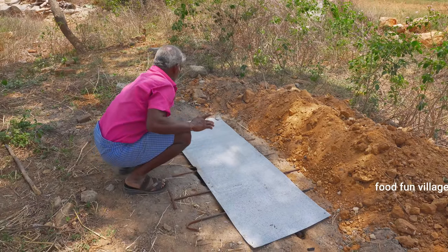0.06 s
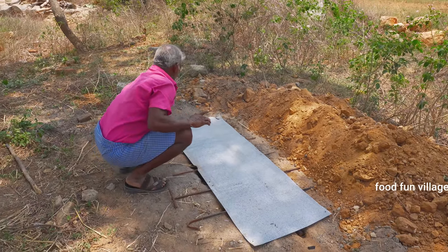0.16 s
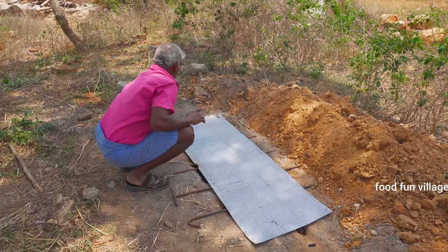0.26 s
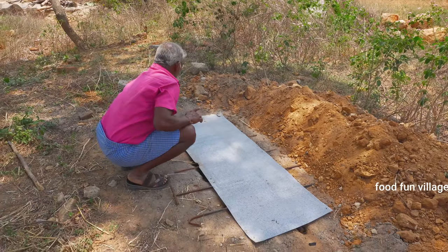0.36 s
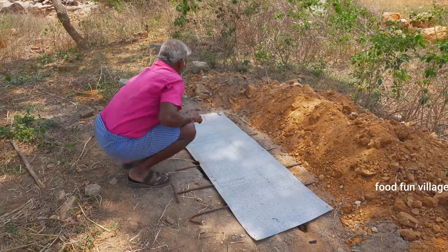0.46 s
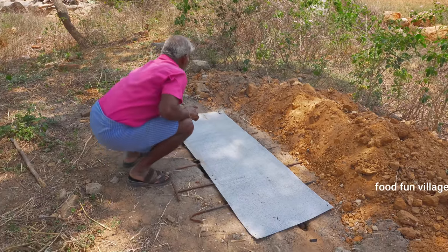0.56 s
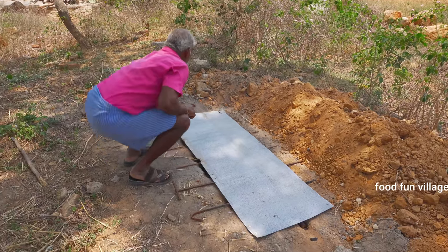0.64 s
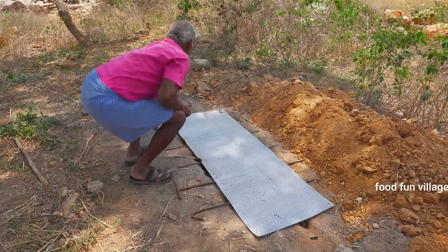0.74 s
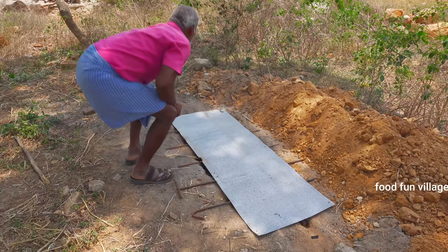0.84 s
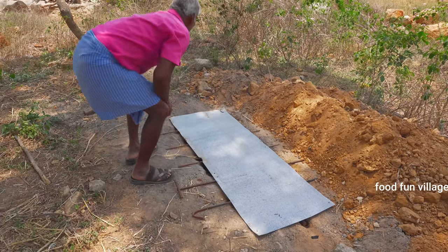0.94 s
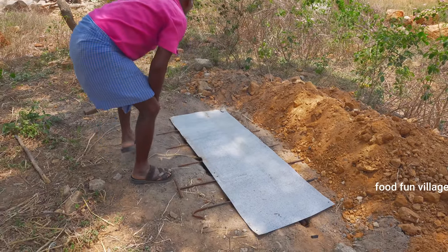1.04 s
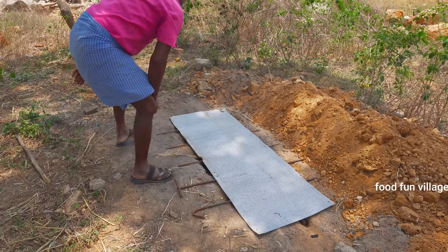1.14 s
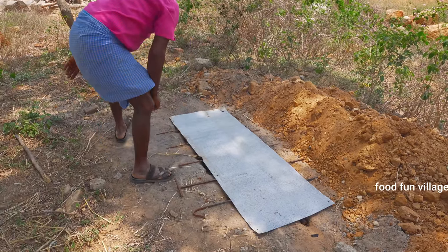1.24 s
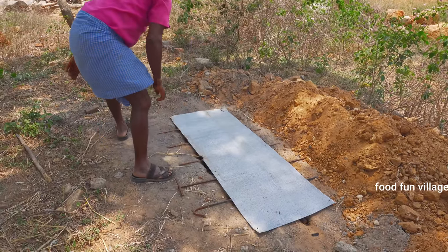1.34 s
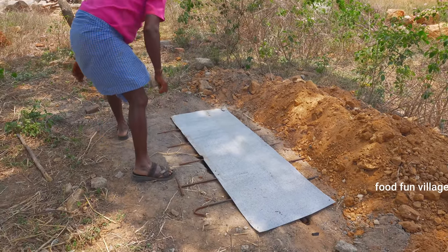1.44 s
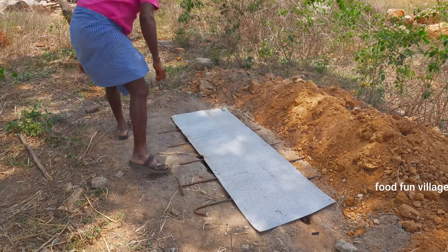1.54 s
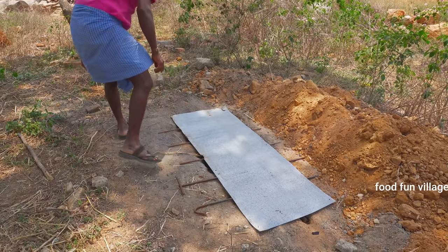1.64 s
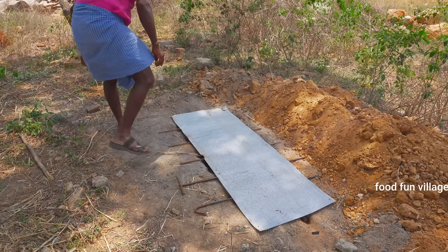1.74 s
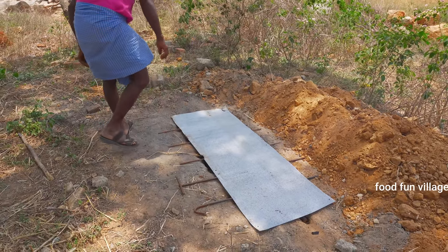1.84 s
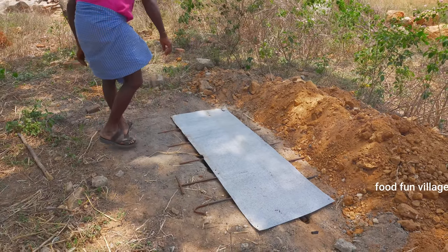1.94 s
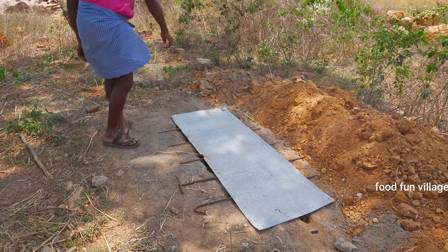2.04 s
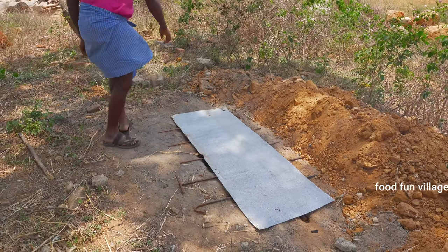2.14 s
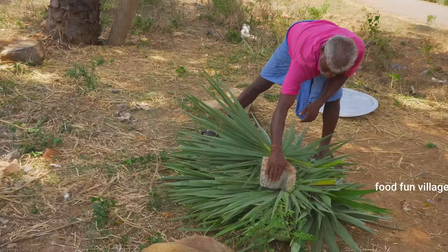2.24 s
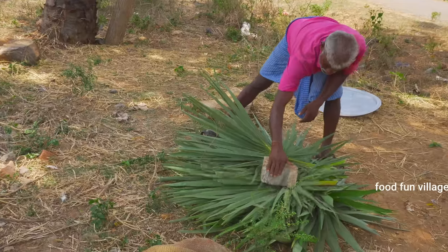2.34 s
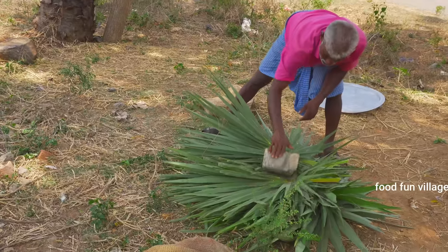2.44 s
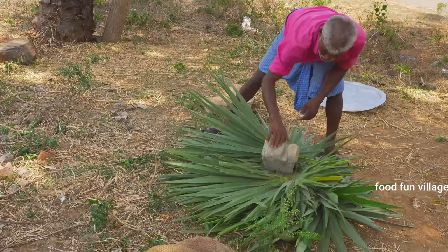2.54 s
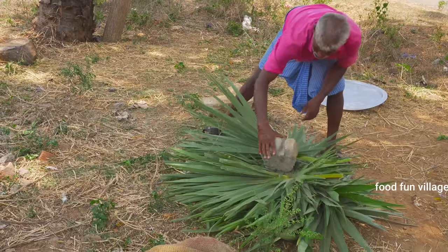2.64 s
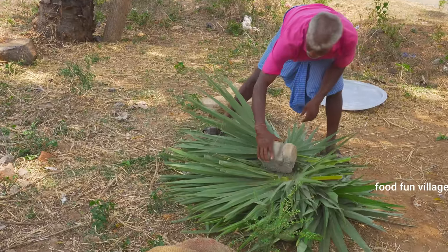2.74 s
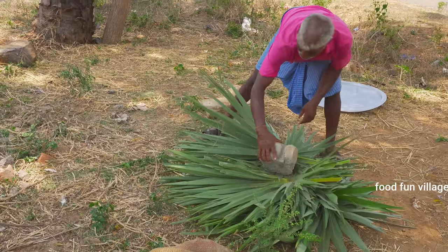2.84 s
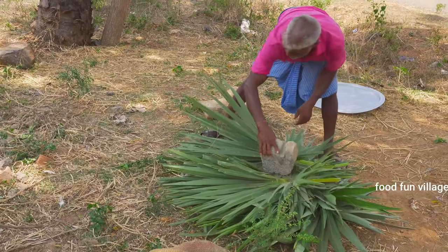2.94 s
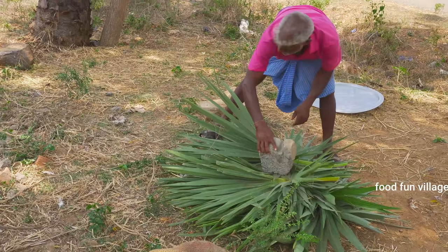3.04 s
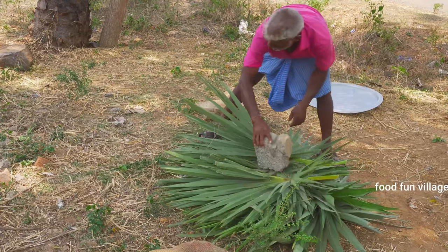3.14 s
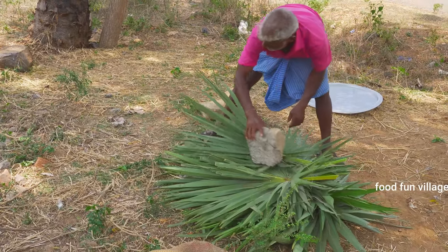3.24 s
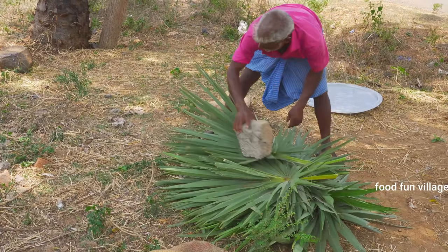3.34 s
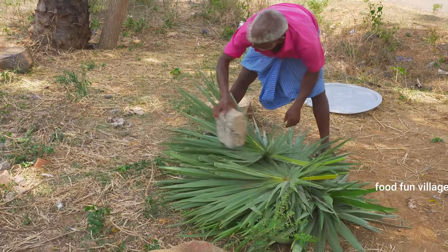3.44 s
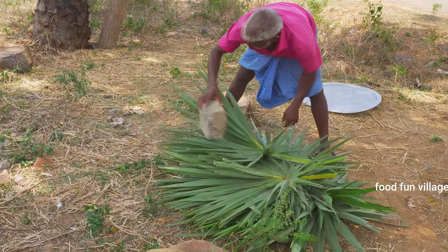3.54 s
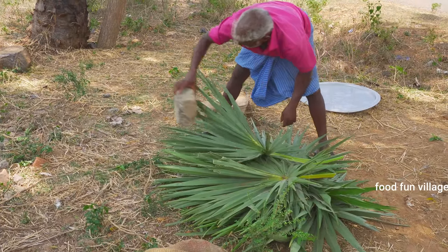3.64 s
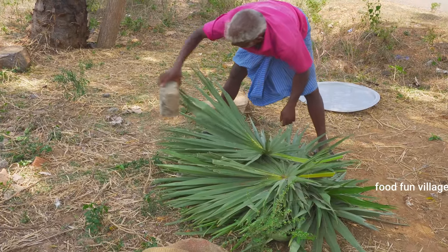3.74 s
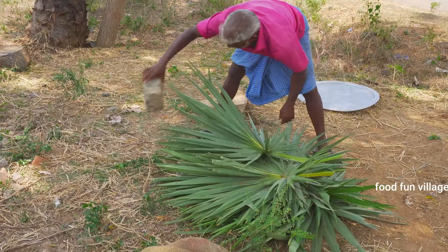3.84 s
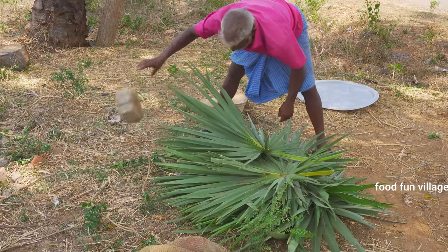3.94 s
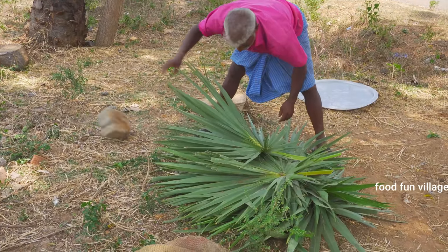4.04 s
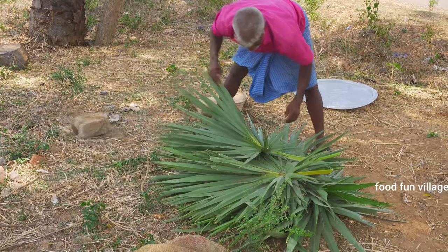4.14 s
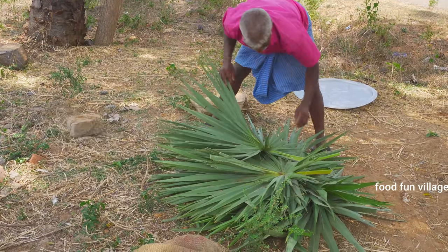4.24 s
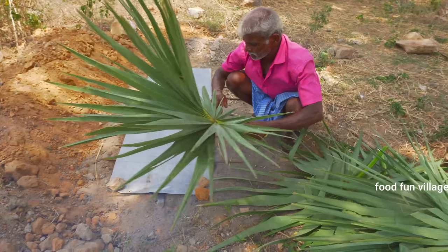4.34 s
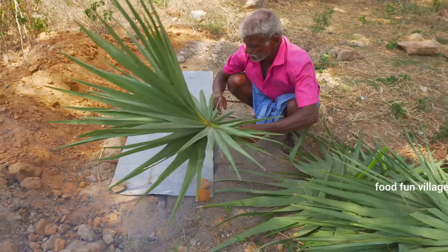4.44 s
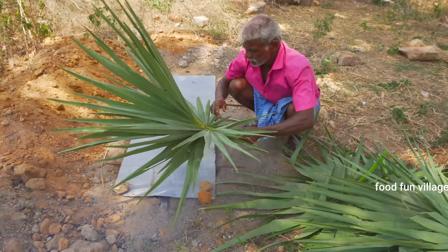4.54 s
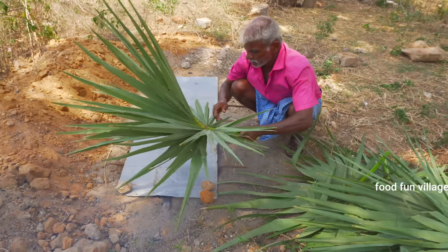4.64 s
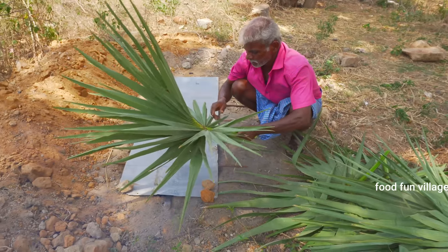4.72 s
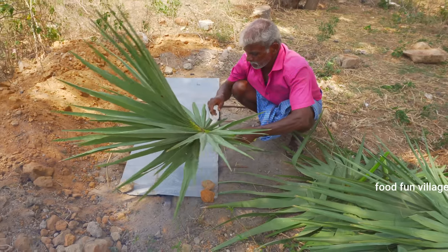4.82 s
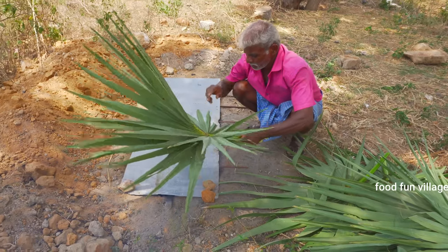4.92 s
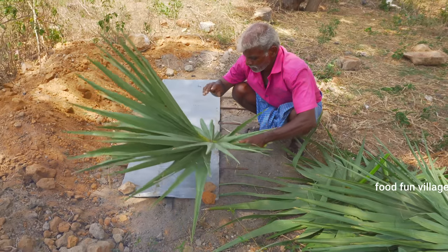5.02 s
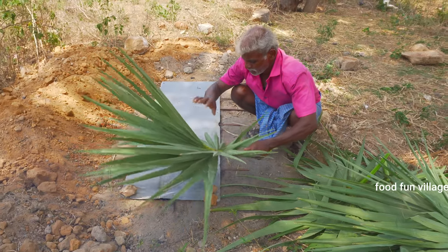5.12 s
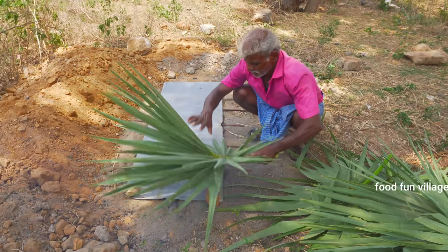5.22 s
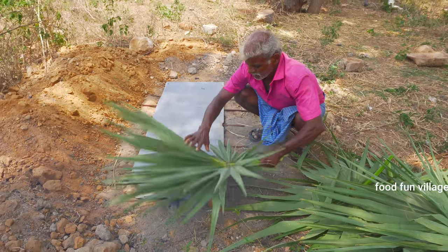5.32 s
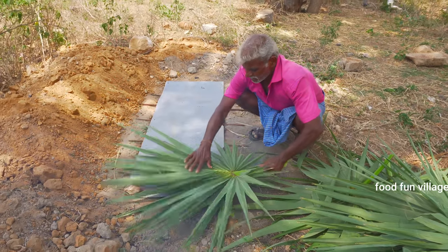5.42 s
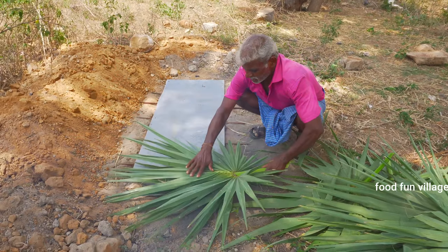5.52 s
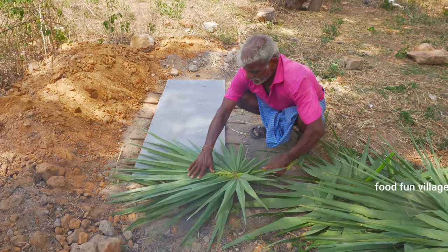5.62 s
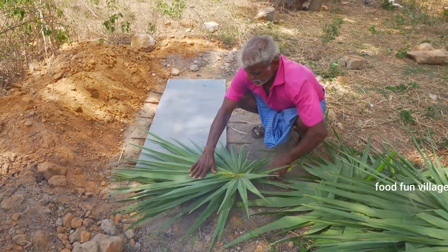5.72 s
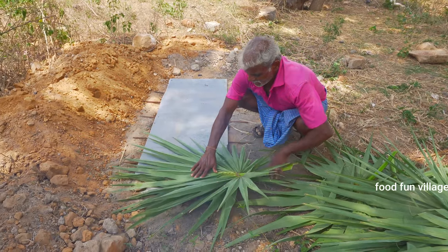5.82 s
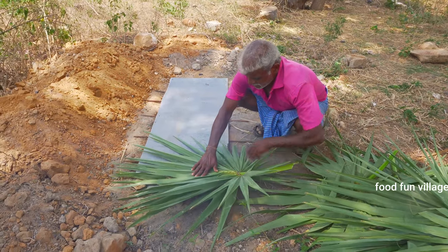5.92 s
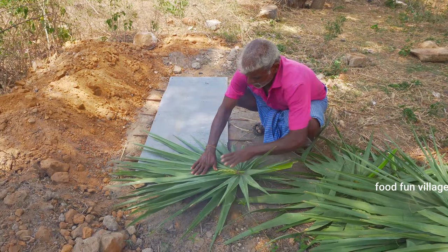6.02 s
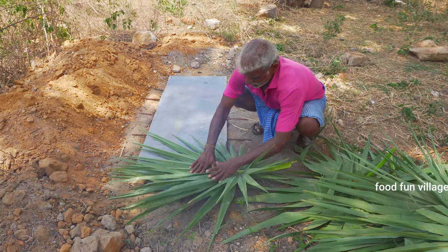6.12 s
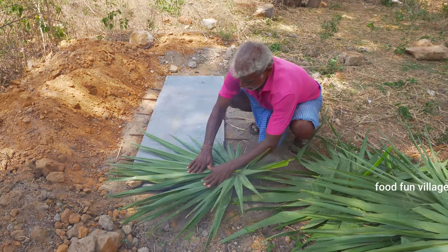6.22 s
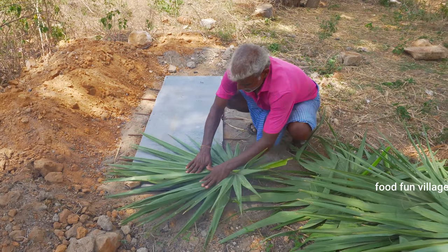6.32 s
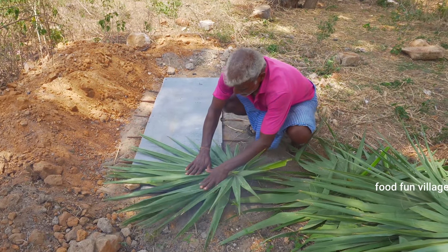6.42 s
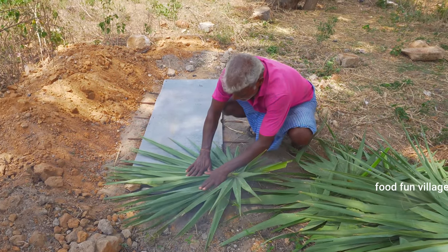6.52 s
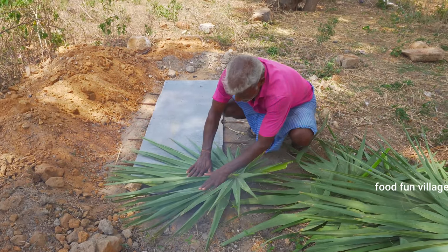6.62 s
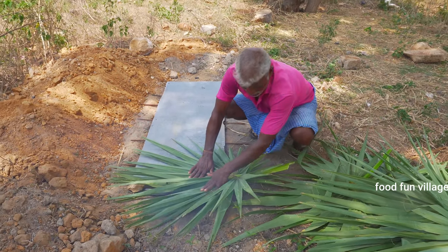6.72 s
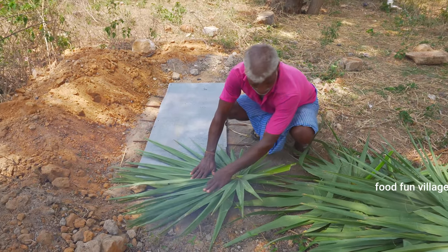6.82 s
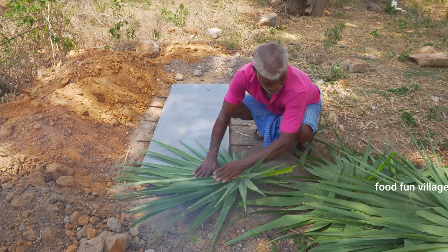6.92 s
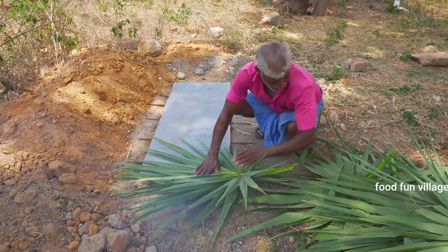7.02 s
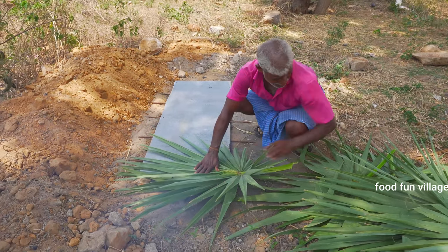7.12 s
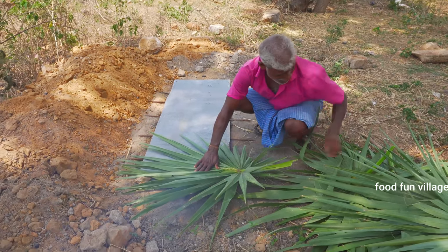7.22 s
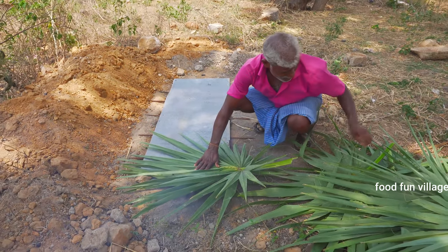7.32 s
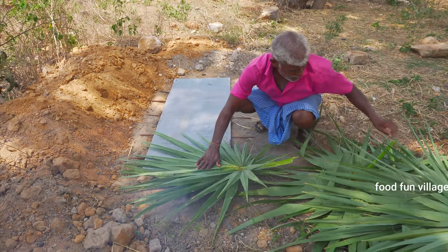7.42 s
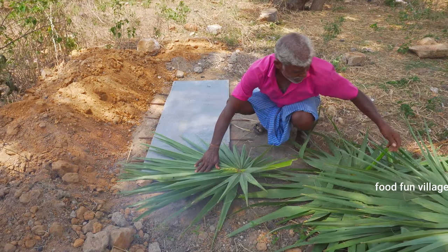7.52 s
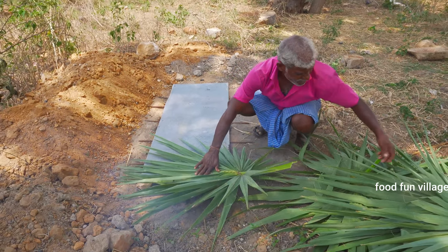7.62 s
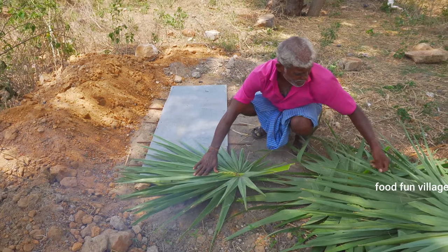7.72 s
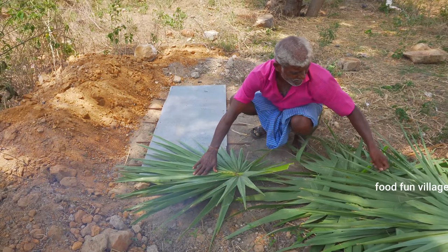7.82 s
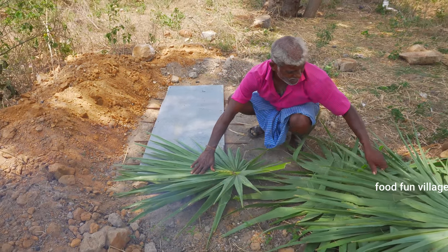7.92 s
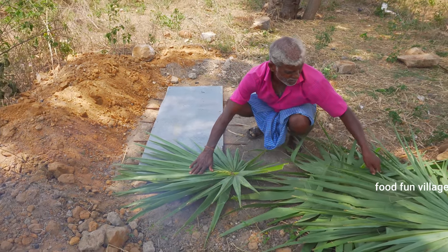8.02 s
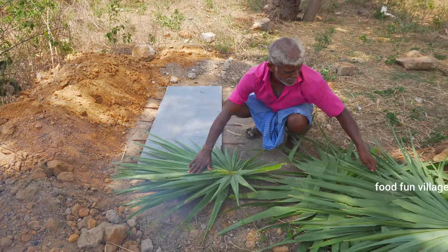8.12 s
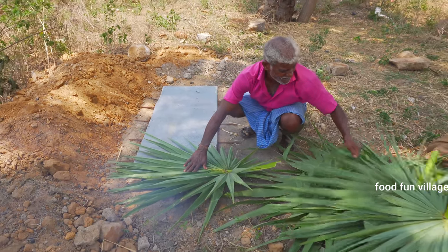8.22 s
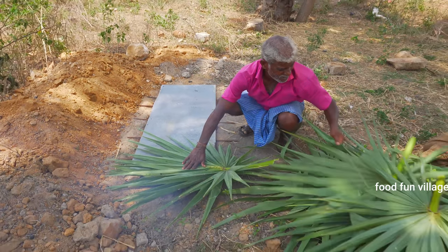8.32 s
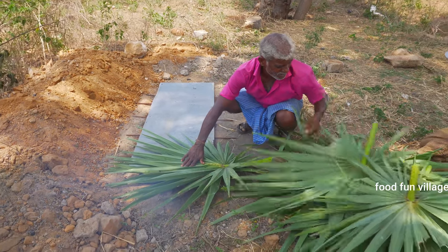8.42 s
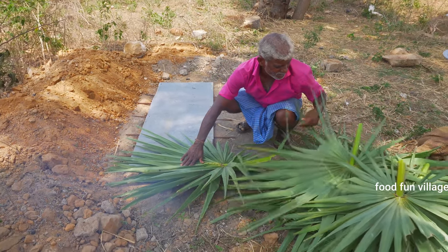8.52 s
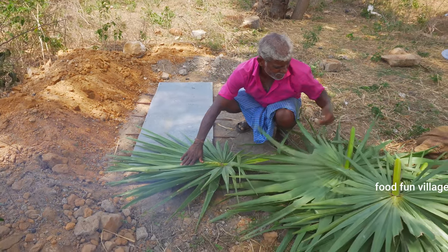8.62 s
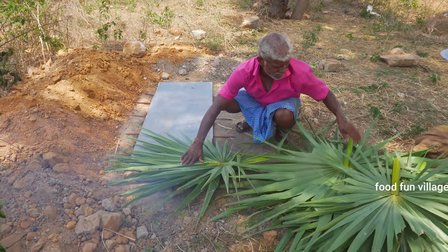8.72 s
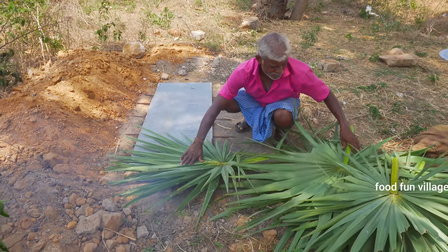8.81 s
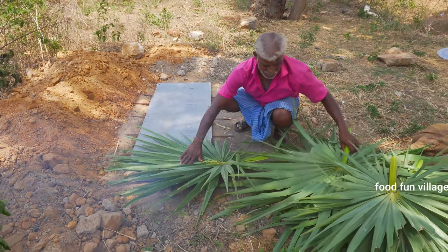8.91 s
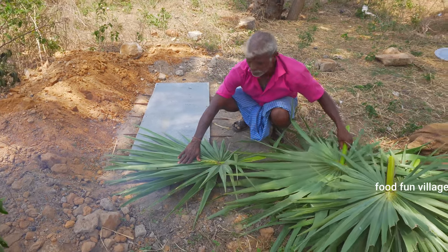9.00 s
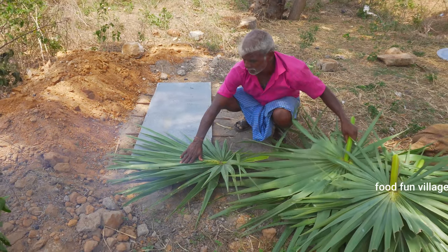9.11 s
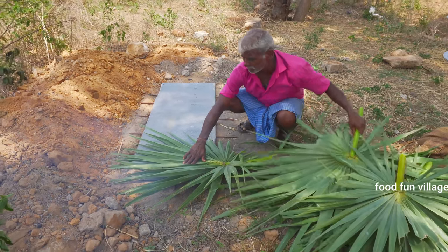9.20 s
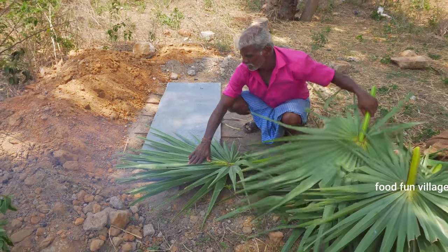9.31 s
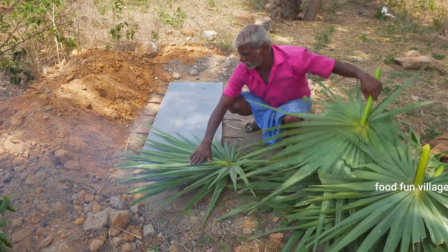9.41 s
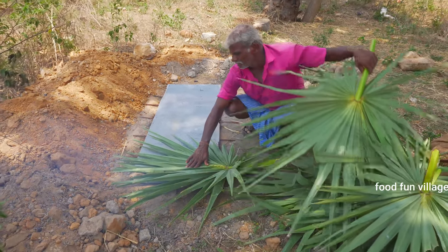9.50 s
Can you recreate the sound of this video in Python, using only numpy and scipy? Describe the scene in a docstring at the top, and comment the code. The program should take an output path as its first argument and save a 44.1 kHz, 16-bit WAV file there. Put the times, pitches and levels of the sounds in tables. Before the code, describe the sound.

A thin metal sheet rings at the very start and is stilled within a second. Twigs and joints click, with soft footfalls near 0.9 and 2.1 seconds and a few faint, distant chirps. From about 2.3 to 4 seconds a stone scrapes off a pile of stiff palm fronds, slightly to the right, the leaf ribs cracking under it. It lands on soil with a dull thud at 4.1 seconds. From there until 8 seconds fronds rustle, crunch and snap close by as they are turned and pressed onto the sheet, with a firm knock at about 5.6. A small bird whistles quick rising notes between 4.5 and 6.1 seconds. From 8.2 seconds fronds slide from the pile with a swish and a knock at 8.7, and a second pull swells at about 9.5. Faint wind in far leaves hisses throughout this open outdoor place.

```python
"""Stiff palm fronds rustle and crack by an outdoor cooking pit, their leaves catching and slipping.
A thin metal sheet rings out first and is stilled; joints and twigs click. A stone is dragged off the
pile and thrown on the soil with a dull thud, then fronds are pressed on the sheet and pulled from the
pile with a swish. A small bird whistles rising notes, others chirp far off, and distant leaves hiss."""
import sys
import numpy as np
from scipy import signal
from scipy.fft import rfft, irfft, next_fast_len
from scipy.io import wavfile
from scipy.ndimage import uniform_filter1d, map_coordinates

SR = 44100
rng = np.random.default_rng(int(sys.argv[2]) if len(sys.argv) > 2 else 0)


def transcribe(u):
    """Save the signal u as a 16-bit wav file named by the first command-line argument.

    u: samples, shape (n,) or (channels, n), limited to [-1, 1]; the rate is SR.
    q: integer samples, one column per channel.
    """
    v = np.clip(np.atleast_2d(u).T, -1, 1)
    q = np.round(v * 32767).astype(np.int16)
    wavfile.write(sys.argv[1], SR, q)


N = 421596

# The sheet's clear modes. Each row: pitch in Hz, relative level in dB, time to fall 60 dB in seconds.
SHEET_MODES = [(245, -4.5, 0.98), (716, -8, 0.86), (1145, 1, 0.33), (1540, -13, 0.44), (1860, -8, 0.61),
               (2100, -11, 0.61)]
# Its wash of dense modes. Each row: frequency in Hz, relative level in dB.
WASH_TONE = [(24, -67), (55, -42), (146, -7.5), (245, -0.5), (422, 0), (1140, 6.5), (1880, 6.5),
             (9000, -24.5), (19800, -120)]
# The tail of that wash. Each row: frequency in Hz, time to fall 60 dB in seconds.
WASH_T60 = [(100, 8), (250, 1.4), (700, 0.93), (2000, 0.47), (6000, 0.56)]
# Colour of the far leaves. Each row: frequency in Hz, relative level in dB.
BREEZE_TONE = [(25, -22.5), (94, -16), (141, -16), (235, -4.5), (352, -1), (414, 0), (486, 4), (5090, -1),
               (11100, -9.5), (15800, -17.5)]
# Their fader. Each row: time in seconds, level in dB.
BREEZE_LEVEL = [(0, -51.5), (2.2, -52), (2.3, -47.5), (4.4, -50.5), (9.56, -51)]
# Stereo width of breeze and of single sources. Each row: frequency in Hz, left-right likeness (1: mono).
BREEZE_LIKENESS = [(60, 0.99), (380, 0.09), (2380, 0.15), (15000, 0.41)]
SOURCE_LIKENESS = [(60, 0.91), (240, 1), (950, 0.98), (2200, 0.97), (3770, 0.65), (15000, 0.57)]
# Distant birds. Each row: start in seconds, length in seconds, pitch in Hz, level in dB.
FAR_CHIRPS = [(0.306, 0.098, 3220, -56), (1.155, .09, 3150, -60), (2.292, 0.075, 4280, -46)]
# Leaves, twigs and joints. Each row: start in seconds, level in dB, centre in Hz, relative knock in dB.
SNAPS = [(0.446, -20.5, 3120, -9), (0.695, -11, 3280, -3), (0.9323, -25, 5330, -15),
         (1.048, -17.5, 3640, -5.5), (1.1288, -22, 4600, -33), (1.306, -33, 1780, 0.5),
         (1.416, -32, 1510, 5), (1.5615, -22, 5550, -31), (2.1252, -25, 2310, -13),
         (2.173, -9, 5700, -16.5), (4.142, -12, 1600, 6), (4.2347, -11.5, 4300, -8.5),
         (4.314, -13.5, 10800, -31), (4.3397, -17, 4770, -27), (4.357, -16, 4470, -10),
         (4.365, -13, 4400, -24), (4.376, -16.5, 4060, -22), (4.68, -26.5, 1700, -10),
         (5.012, -15, 7450, -55), (5.243, -31, 4000, -9), (5.4984, -5, 2200, -16), (5.6205, -13, 4940, 0),
         (5.655, -12, 2410, 8), (5.7437, -13, 1820, -32), (5.8354, -16, 2100, -15), (5.955, -20.5, 1570, 0),
         (6.11, -18, 2170, -5), (6.144, -19, 5060, 0), (6.151, -17, 6160, -7), (6.197, -16, 4500, -20),
         (6.2098, -10.5, 4000, -8), (6.238, -17, 6000, -20), (6.31, -16, 2500, -17),
         (6.391, -22.5, 1950, 1), (6.4744, -11.5, 5460, -7), (6.52, -18, 5500, -25),
         (6.553, -14, 3870, -1.5), (6.575, -15, 6460, -8), (6.582, -3.5, 3900, -43), (6.611, -7, 4760, -37),
         (6.727, -14.5, 2160, -23), (6.7757, -17, 4100, -33), (6.8686, -18.5, 5900, -4.5),
         (6.972, -25.5, 1880, 8.5), (6.987, -10.5, 4270, -19), (7.3474, -22.5, 2180, -10),
         (7.619, -18.5, 4640, -14), (7.796, -19.5, 2760, -9), (8.773, -14.5, 4400, -27),
         (8.8424, -15.5, 8000, -12), (9.017, -18, 4740, -8), (9.0359, -15, 3040, -7),
         (9.092, -15.5, 3030, -23)]
# Where the hands work. Each row: time in seconds, left over right in dB.
HAND_PAN = [(.4, 3), (2.1, 7), (2.5, -3.5), (3.9, 0), (4.14, 6), (4.4, -0.5), (6.6, 3), (7.8, -2.5),
            (8.3, -9.5), (8.9, -3.5), (9.45, -8)]
# Heel, stone and palm landing. Each row: start in seconds, level in dB, base pitch in Hz,
# base decay time in seconds.
THUDS = [(0.874, -31, 455, 0.056), (2.108, -33.5, 508, 0.024), (4.145, -26, 247, 0.084),
         (4.235, -33, 283, 0.13), (5.558, -8.5, 750, 0.048), (6.645, -32.5, 242, 0.14),
         (7.645, -24.5, 396, 0.23), (8.701, -10, 810, 0.027), (8.717, -22, 926, 0.031)]
# Long gestures: the stone shifts, rests and drags off with a catch; two fronds are pulled, with fumbling
# between. Each row: time in seconds, level in dB, relative body (under 1.5 kHz) in dB.
STONE_DRAG = [(2.26, -71.5, 10.5), (2.42, -34.5, -6), (2.547, -37, 0.5), (2.618, -27, -3.5),
              (2.777, -39.5, -7), (2.93, -55, 4.5), (3.072, -38, -9), (3.16, -42, -4), (3.402, -27, -2),
              (3.507, -29, -1.5), (3.555, -45.5, 6.5), (3.58, -26.5, -2.5), (3.908, -33, -6.5),
              (4.0, -59.5, 11.5), (4.1, -67, 5.5)]
FROND_PULLS = [(8.16, -54, -11), (8.23, -50.5, 1), (8.25, -34.5, -3), (8.372, -22.5, -7),
               (8.565, -23.5, -9), (8.61, -30, -2), (8.72, -30.5, -3), (8.805, -48.5, 0.5), (8.9, -46, 1),
               (8.94, -31.5, -9.5), (8.98, -44.5, -1.5), (9.16, -41.5, -7), (9.338, -32, -5.5),
               (9.346, -26, -4), (9.56, -21.5, -11.5)]
# The loudest leaf ribs slipping under the stone. Each row: start in seconds, level in dB.
RIB_SLIPS = [(2.4124, -16.5), (2.4967, -13), (2.5194, -18), (2.5605, -10.5), (2.570, -7.5), (2.6, -5.5),
             (2.613, -7.5), (2.6254, -12), (2.645, -8), (2.6515, -11), (2.6596, -7), (2.675, -20),
             (2.6954, -14), (2.7074, -9), (2.7218, -6.5), (2.7505, -10), (2.7654, -13), (2.7705, -16),
             (2.7881, -15.5), (2.85, -24.5), (2.8694, -26), (2.9439, -25.5), (2.9767, -22.5), (3.055, -11),
             (3.0744, -15), (3.1682, -19.5), (3.1906, -16), (3.2265, -13.5), (3.275, -11), (3.3358, -14),
             (3.461, -14), (3.5715, -11.5)]
# Short gestures in the leaves. Each row: crest, rise and fall in seconds, level in dB,
# relative body (under 1.5 kHz) in dB, relative top (over 7.5 kHz) in dB.
LAYING_MOVES = [(4.16, 0.025, 0.24, -51, 13, -5), (4.245, 0.086, 0.095, -42, -4, 9),
                (4.32, 0.3, 0.023, -45, -6, 6.5), (4.7, 0.45, 1, -48.5, -12.5, -9),
                (5.028, 0.15, 0.16, -40.5, -22, 4.5), (5.25, .02, 0.1, -52.5, -17, 11),
                (5.31, 0.031, 0.25, -40.5, -0.5, -11), (5.441, 0.13, 0.37, -28.5, -2, -4.5),
                (5.54, 0.25, 0.1, -31.5, 2, -11), (5.681, 0.4, 0.19, -30, 1, -9.5),
                (5.963, 0.33, 0.063, -38, -1.5, -15), (6.229, 0.13, 0.26, -35, 1, -14),
                (6.309, 0.19, 0.065, -32.5, -14, -13), (6.49, 0.29, 0.23, -43, -14, -8.5),
                (6.64, 0.17, 0.31, -37, -3.5, -9.5), (7.001, 0.14, 0.15, -37.5, -8, -10.5),
                (7.39, 0.18, 0.098, -41.5, -4.5, -5), (7.66, 0.27, 0.1, -42, -2.5, -1),
                (7.83, 0.18, 0.14, -44, 0.5, 1), (8.13, 0.15, 0.083, -49.5, -4.5, 1.5)]
# Colour of each rustle. Each row: frequency in Hz, relative level in dB.
STONE_TONE = [(24, -70), (40, -43), (175, -29), (289, -15.5), (380, -17.5), (611, -5), (846, -8),
              (1620, 0.5), (2360, 3), (3500, 0), (4400, 3.5), (5810, 4), (8600, -0.5), (9600, 2.5),
              (12000, 0), (15800, 0)]
LAYING_TONE = [(24, -62), (40, -29), (179, -24.5), (261, -9), (330, -12), (553, -10), (805, -1.5),
               (1360, -5), (2450, -3), (2800, -8.5), (3200, -7.5), (4500, -4.5), (7500, -9), (11000, -13.5),
               (15800, -16.5)]
PULLING_TONE = [(24, -70), (40, -46), (166, -28), (311, -13), (380, -15), (539, -6.5), (1110, -5),
                (1360, -9), (2190, -4), (2610, -4), (3700, -6), (4640, -10), (6580, -11), (12600, -17),
                (15800, -22)]
# Stereo tilt of each rustle. Each row: frequency in Hz, relative left over right in dB.
STONE_TILT = [(60, -8), (380, -8.5), (2380, -9.5), (15000, -2)]
LAYING_TILT = [(60, 0.33), (380, 2.1), (2380, 0.76), (15000, 8.1)]
PULLING_TILT = [(60, -7), (380, -6.5), (2380, -6.5), (15000, 4.5)]
# Stereo phase of each rustle. Each row: frequency in Hz, lead of the left side in radians.
STONE_LEAD = [(0, 0)]
LAYING_LEAD = [(0, -2), (3620, 0.53), (4570, 0.4), (9220, 8), (16300, 4)]
PULLING_LEAD = [(0, -2), (2070, 0.5), (3190, -5.5), (4910, -6.5), (16300, -4.5)]
# The small bird's song. Each row: start and length in seconds, opening and turning pitch in Hz,
# curve of the glide as an exponent, level in dB.
BIRD_NOTES = [(4.542, 0.1, 5200, 6540, 1.7, -52), (4.712, 0.087, 4800, 6530, 1.9, -41.5),
              (4.857, 0.08, 4700, 6530, 1.3, -42), (4.997, 0.082, 4700, 6620, 1.2, -40.5),
              (5.136, 0.083, 4700, 6530, 1.3, -38.5), (5.277, 0.088, 4650, 6680, 1.22, -36),
              (5.782, .05, 3700, 7230, 0.88, -42), (5.921, 0.073, 3450, 6900, 1.9, -40),
              (6.036, 0.051, 5530, 3270, 1.1, -46), (6.093, 0.046, 3300, 6750, 1.2, -42)]
# The swish of the first pulled frond. Each row: centre in Hz, width in octaves, level in dB.
SWISH_BANDS = [(2120, 0.14, -30), (3440, 0.24, -23.5)]


def amp(db):
    """Decibels to gain."""
    return 10 ** (np.asarray(db) / 20)


def unit(x):
    """x at rms 1."""
    return x / np.sqrt(np.mean(x ** 2) + 1e-20)


def along(points, hz):
    """Read a curve of (Hz, value) points on a log-frequency axis."""
    f, v = np.transpose(points)
    return np.interp(np.log(hz + 1), np.log(f + 1), v)


def filtered(x, response):
    """EQ x with a gain given as a function of frequency."""
    m = next_fast_len(x.shape[-1] + 4096)
    return irfft(rfft(x, m) * response(np.fft.rfftfreq(m, 1 / SR)), m)[..., :x.shape[-1]]


def bell(hz, centre_hz, octaves):
    """A bell curve on the log-frequency axis."""
    return np.exp(-.5 * (np.log2((hz + 1) / centre_hz) / octaves) ** 2)


def stereo_noise(size, likeness):
    """White noise whose stereo width follows frequency."""
    def mid_side(hz):
        angle = np.arccos(np.clip(along(likeness, hz), -1, 1)) / 2
        return np.array([np.cos(angle), np.sin(angle)])
    mid, side = filtered(rng.standard_normal((2, size)), mid_side)
    return np.array([mid + side, mid - side])


def pan(db):
    """Left and right gains for a level difference."""
    return amp(np.array([db / 2, -db / 2]))


def hand_pan_db(t):
    """Where the hands sit in the stereo image at times t."""
    return np.interp(t, *np.transpose(HAND_PAN))


def crackle(size, rate, spread_db, life_s):
    """Power envelope of mean 1: random leaf contacts, few strong and many weak, sharp on, dying fast."""
    strengths = amp(spread_db * np.clip(rng.standard_normal(size), -3, 2.2))
    kicks = (rng.random(size) < rate / SR) * strengths ** 2 / rate
    softened = uniform_filter1d(kicks, size=24)
    power = np.abs(signal.lfilter([1], [1, -np.exp(-1 / (life_s * SR))], softened))
    return power / (power.mean() + 1e-20)


def metal_sheet(stop_s=0.63):
    """The dropped sheet rings, a few clear modes in a wash of many, until a hand or foot stills it."""
    t = np.arange(SR) / SR
    hz, frame_s, spectrum = signal.stft(stereo_noise(SR, [(200, 0.97), (4000, 0.88)]), SR, nperseg=512)
    spectrum *= amp(along(WASH_TONE, hz)[:, None] - 60 * frame_s / along(WASH_T60, hz)[:, None])
    wash = signal.istft(spectrum, SR, nperseg=512)[1][:, :SR]
    ring = sum(amp(db - 60 * t / t60) * np.sin(2 * np.pi * (f * t + rng.random()))
               for f, db, t60 in SHEET_MODES)
    out = amp(-29.5) * wash / np.std(wash[:, :SR // 10]) + amp(-31.5) * ring
    damping = amp(-60 * np.clip(t - stop_s, 0, 1) / 0.43)
    return np.pad(out * damping, ((0, 0), (0, N - SR)))


def breeze():
    """Far leaves in light wind: a faintly grainy bed of hiss."""
    grain = np.sqrt(0.75 + 0.24 * crackle(N, rate=34, spread_db=-1.5, life_s=0.0036))
    hiss = unit(filtered(stereo_noise(N, BREEZE_LIKENESS) * grain, lambda f: amp(along(BREEZE_TONE, f))))
    return amp(np.interp(np.arange(N) / SR, *np.transpose(BREEZE_LEVEL))) * hiss


def far_birds():
    """Distant chirps, smeared by the trees into narrow puffs of noise."""
    out = np.zeros((2, N))
    for start, length, hz, db in FAR_CHIRPS:
        u = np.arange(round(length * SR)) / (length * SR)
        puff = unit(filtered(stereo_noise(len(u), SOURCE_LIKENESS), lambda f: bell(f, hz, 0.047)))
        out[:, round(start * SR):][:, :len(u)] += amp(db - 6.6 * u) * np.sin(np.pi * u) ** 0.35 * puff
    return out


def snaps():
    """A leaf, twig or joint gives way: a bright spike with a brief rattle, over a lower knock."""
    out, t, preroll = np.zeros((2, N + SR)), np.arange(SR // 20) / SR, SR // 100
    rattle, spike = amp(-60 * t / 0.026), 2.2 * amp(-60 * t / 0.0073)
    envelope = (rattle + spike) * (1 - np.exp(-t / 0.00047))
    for start, db, hz, knock_db in SNAPS:
        burst = np.pad(stereo_noise(len(t), SOURCE_LIKENESS) * envelope, ((0, 0), (preroll, 0)))
        bright = filtered(burst, lambda f: bell(f, hz, 0.28) + 0.5 * bell(f, 1.135 * hz, 1.0))
        knock = filtered(burst, lambda f: 600j * f / (900 ** 2 - f ** 2 + 600j * f) * f / (f + 400))
        snap = bright / np.abs(bright).max() * pan(hand_pan_db(start))[:, None]
        snap += amp(knock_db) * knock / np.abs(knock).max()
        out[:, round(start * SR) - preroll:][:, :snap.shape[1]] += amp(db - 3.5) * snap
    return out[:, :N]


def thuds():
    """Dull blows on soil or sheet: a few damped low swings and a short puff of grit."""
    out, t = np.zeros(N + SR), np.arange(SR // 5) / SR
    attack = 1 - np.exp(-t / 0.00054)
    for start, db, hz, decay in THUDS:
        swing = sum(amp(-60 * t * k / decay) * np.sin(2 * np.pi * hz * k * t) for k in (.85, 1.5, 2.6))
        grit = unit(filtered(rng.standard_normal(len(t)), lambda f: bell(f, 0.95 * hz, 1.0)))
        puff = grit * amp(-75 * t / decay)
        out[round(start * SR):][:len(t)] += amp(db) * (0.24 * swing + 0.54 * puff) * attack
    return filtered(out[:N], lambda hz: hz ** 2 / (hz ** 2 + 90 ** 2))  # small blows carry little bass


def leaf_ring(x, depth_db):
    """Each leaf rings briefly at its own pitches: random patches of gain in time and frequency."""
    spectrum = signal.stft(x, nperseg=512)[2]
    patches = uniform_filter1d(rng.standard_normal(spectrum.shape[1:]), size=3, axis=0)
    patches = uniform_filter1d(patches, size=7, axis=1)
    return signal.istft(spectrum * amp(depth_db * unit(patches)), nperseg=512)[1][:, :x.shape[1]]


def rib_cracks(t, noise, slips, swell_s=0.0013):
    """A slipping rib cracks: a quick burst that rings low and high, scooped between."""
    power = np.zeros(len(t))
    for start, db in slips:
        u = np.clip(t - start, 0, 1) / swell_s
        power += (amp(db - 10) * u * np.exp(1 - u)) ** 2  # trimmed: noise peaks well over its rms
    return filtered(noise * np.sqrt(power), lambda f: (1 - 0.52 * bell(f, 3570, 0.25)) * f / (f + 700))


def late_copy(hz, notch_hz):
    """A faint, late copy of the sound cuts shallow notches at odd multiples of notch_hz."""
    return 1 + 0.12 * np.exp(-1j * np.pi * hz / notch_hz)


def lowpass(hz, corner_hz):
    """Gain of an 18 dB per octave roll-off."""
    return 1 / np.sqrt(1 + (hz / (corner_hz + 1)) ** 6)


def rustle(gesture, tone, tilt, lead, rate, spread_db, life_s, smooth, notch_hz, slips=()):
    """Sliding leaves: a smooth hiss broken up by contacts, some full-range, some in one band only."""
    t, level_db, body_db, top_db = gesture
    start, size, hand_db = round(t[0] * SR), len(t), hand_pan_db(t)
    rate = rate * amp(0.46 * (level_db - level_db.max()))  # faster motion, more contacts a second
    shared = crackle(size, rate, spread_db, life_s)
    noise = leaf_ring(stereo_noise(size, SOURCE_LIKENESS), depth_db=2.5)
    cracks = rib_cracks(t, noise[:, ::-1], slips)
    out, bands, rms = np.zeros((2, N)), [], []
    for lo_hz, hi_hz, trim_db, pan_db in [(0, 1500, body_db, np.zeros(size)), (1500, 3000, 0, hand_db),
                                          (3000, 7500, 0, hand_db), (7500, SR, top_db, hand_db)]:
        def colour(hz):
            band = lowpass(hz, hi_hz) * np.sqrt(1 - lowpass(hz, lo_hz) ** 2)
            balance = pan(along(tilt, hz) - along(tilt, 2740))  # the tilt pivots at 2740 Hz
            phase = np.exp(.5j * along(lead, hz) * [[1], [-1]])
            return late_copy(hz, notch_hz) * amp(along(tone, hz)) * band * balance * phase
        own = crackle(size, rate * 0.42, spread_db, life_s)
        power = amp(2 * level_db) * (smooth + (1 - smooth) * (shared + own) / 2)
        friction = noise * np.sqrt(power) + cracks
        bands.append(filtered(friction * amp(trim_db) * pan(pan_db), colour))
        rms.append(np.std(filtered(noise, colour)))
    body, low_mid, high_mid, top = bands
    out[:, start:start + size] = body / rms[0] + (low_mid + high_mid) / np.hypot(*rms[1:3]) + top / rms[3]
    return out


def long_gesture(rows, crisp_db, dulling):
    """Time, level, body and top of one sweep; the harder it goes, the smaller the share of top."""
    times, levels, bodies = np.transpose(rows)
    t = np.arange(round(times[0] * SR), min(N, round(times[-1] * SR))) / SR
    level_db = np.interp(t, times, levels)
    return t, level_db, np.interp(t, times, bodies), crisp_db - dulling * (level_db - level_db.max())


def stone_drag():
    """The stone scrapes off the pile, making stiff leaves jerk and crack."""
    return rustle(long_gesture(STONE_DRAG, crisp_db=-29, dulling=0.35),
                  STONE_TONE, STONE_TILT, STONE_LEAD,
                  rate=220, spread_db=5.5, life_s=0.0056, smooth=0.23, notch_hz=2660, slips=RIB_SLIPS)


def frond_laying(start_s=4.13, end_s=8.22, rise_fall_db=20, rest_db=-57.5):
    """Leaves crunch as the stone tumbles out and hands turn a frond, press it down and smooth it."""
    t = np.arange(round(start_s * SR), round(end_s * SR)) / SR
    crest, rise, fall, db, body_db, top_db = np.transpose(LAYING_MOVES)[:, :, None]
    power = amp(2 * (db - rise_fall_db * np.maximum((crest - t) / rise, (t - crest) / fall))) + 1e-30
    level_db = 10 * np.log10(power.sum(0) + amp(2 * rest_db))  # the leaves never quite rest
    share = power / power.sum(0)  # the loudest move sets the colour
    gesture = t, level_db, (share * body_db).sum(0), (share * top_db).sum(0)
    return rustle(gesture, LAYING_TONE, LAYING_TILT, LAYING_LEAD,
                  rate=390, spread_db=4.5, life_s=0.0051, smooth=0.028, notch_hz=2760)


def small_bird(swoop_hz=2200):
    """Whistled glides that waver, turn back at the end and smear a little in the trees."""
    song = np.zeros(N)
    for start, length, from_hz, to_hz, bend, db in BIRD_NOTES:
        u = np.arange(round(length * SR)) / (length * SR)
        pitch_waver, level_waver = (map_coordinates(rng.standard_normal(16), [12 * u]) for _ in range(2))
        glide = np.clip(u / .85, 0, 1) ** bend
        if abs(to_hz - from_hz) > swoop_hz:  # wide notes ease in and out
            glide = np.sin(np.pi / 2 * glide) ** 1.3
        glide -= 3.5 * np.clip(u - .85, 0, 1)
        hz = (from_hz + (to_hz - from_hz) * glide) * (1 + 0.0092 * pitch_waver)
        level = amp(db - 1.7 * u + 3 * level_waver) * np.sin(np.pi * u) ** 0.18
        song[round(start * SR):][:len(u)] += level * np.sin(2 * np.pi * np.cumsum(hz) / SR)
    t = np.arange(SR // 5) / SR
    trees = rng.standard_normal((2, len(t))) * amp(-60 * t / 0.084)
    smear = signal.fftconvolve(song[None], trees / np.linalg.norm(trees[0]), axes=1)[:, :N]
    return song * pan(-1.5)[:, None] + amp(-1) * smear


def frond_pulls():
    """Fronds slide out of the pile in a dense sweep of tiny contacts."""
    return rustle(long_gesture(FROND_PULLS, crisp_db=-16.5, dulling=0.58),
                  PULLING_TONE, PULLING_TILT, PULLING_LEAD,
                  rate=800, spread_db=3.0, life_s=0.0018, smooth=0.38, notch_hz=2640)


def swish(start_s=8.33, full_s=8.47, end_s=8.58):
    """Leaf blades sliding fast along each other: two bands of smooth hiss."""
    t, out = np.arange(round(start_s * SR), round(end_s * SR)) / SR, np.zeros((2, N))
    swell = np.sqrt(np.interp(t, [start_s, full_s, end_s - .03, end_s], [0.0018, 1, 0.28, 0]))
    for hz, width, db in SWISH_BANDS:
        hiss = unit(filtered(stereo_noise(len(t), SOURCE_LIKENESS), lambda f: bell(f, hz, width)))
        out[:, round(start_s * SR):round(end_s * SR)] += amp(db) * swell * hiss * pan(hand_pan_db(t))
    return out


def scene():
    """The stereo mix: fronds and impacts up front, birds and breeze behind."""
    fronds = stone_drag() + frond_laying() + frond_pulls() + swish()
    return fronds + snaps() + thuds() + metal_sheet() + small_bird() + far_birds() + breeze()


def record(dry):
    """A brick-wall high cut at 15.8 kHz."""
    return filtered(dry, lambda hz: hz < 15800)


dry = scene()
out = record(dry)
transcribe(out)
```